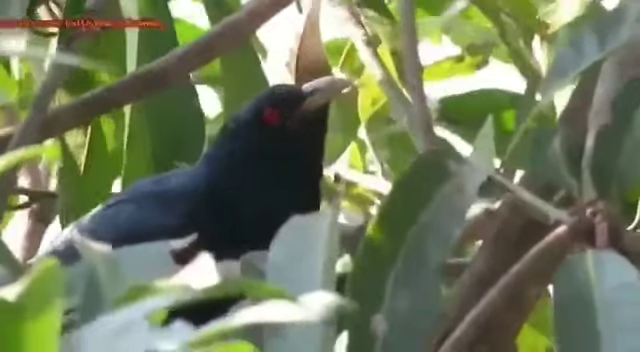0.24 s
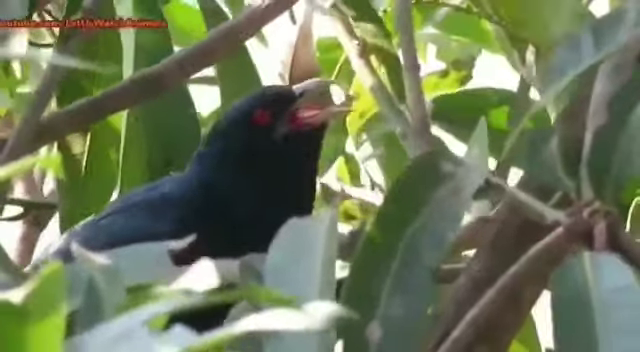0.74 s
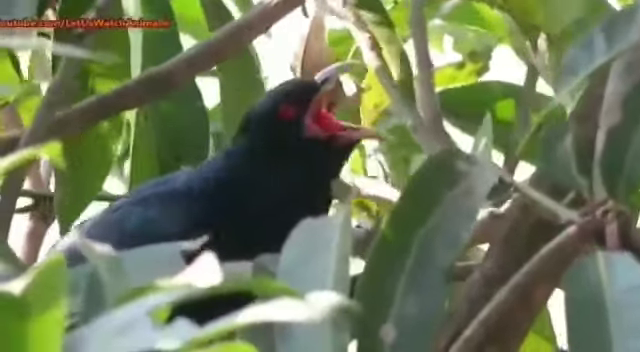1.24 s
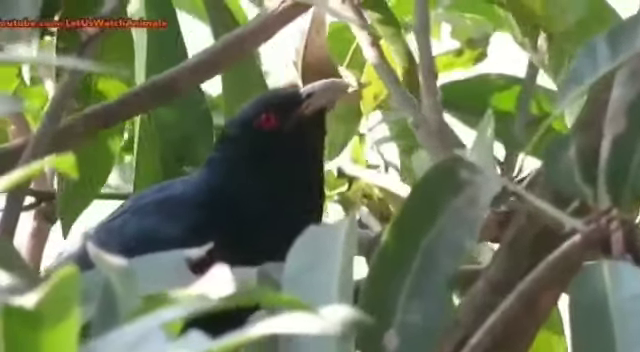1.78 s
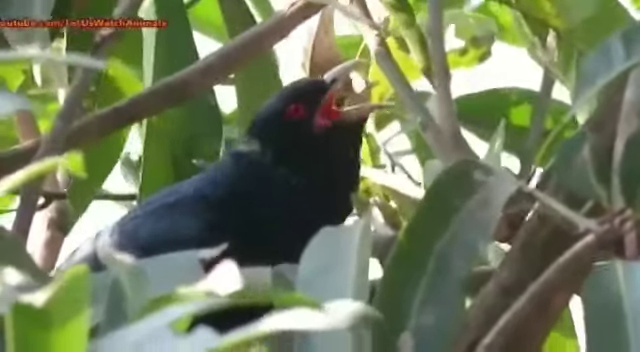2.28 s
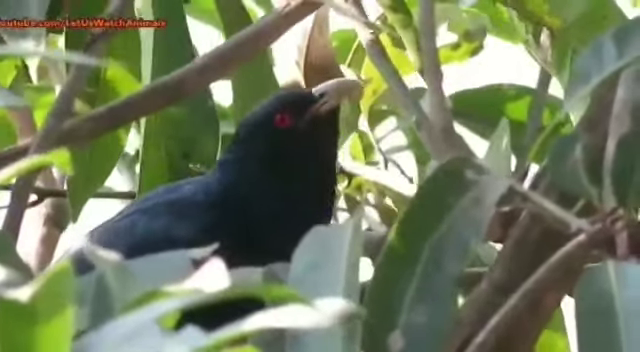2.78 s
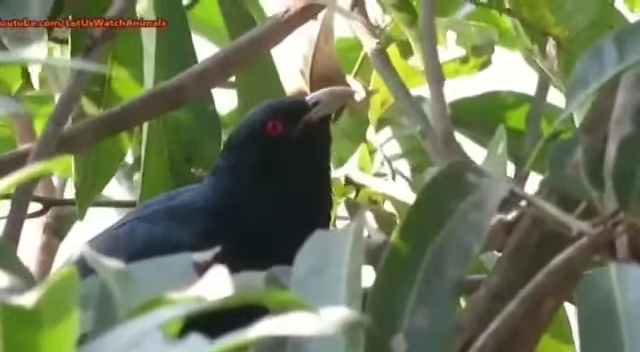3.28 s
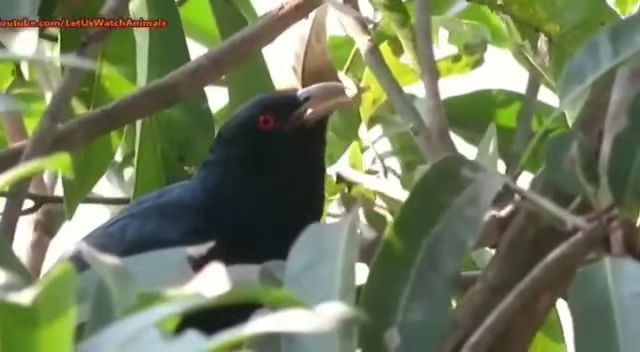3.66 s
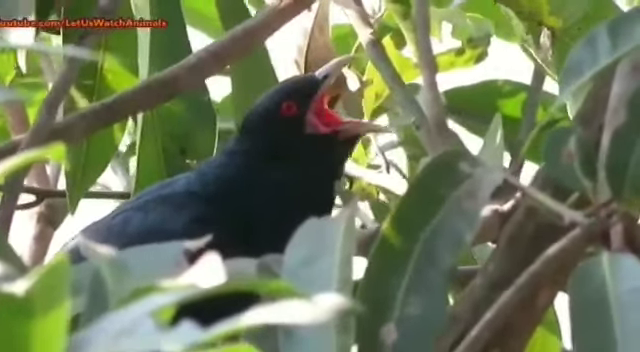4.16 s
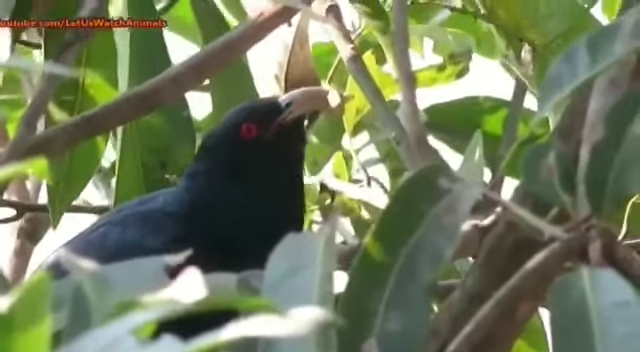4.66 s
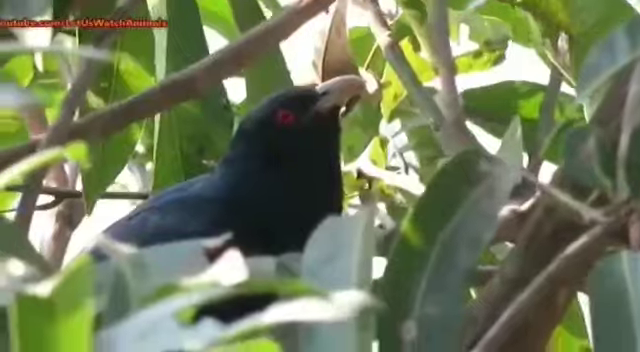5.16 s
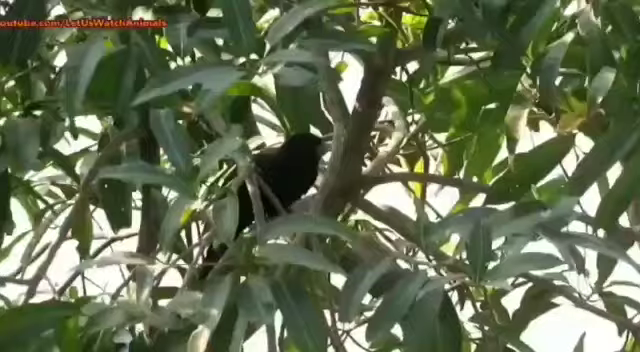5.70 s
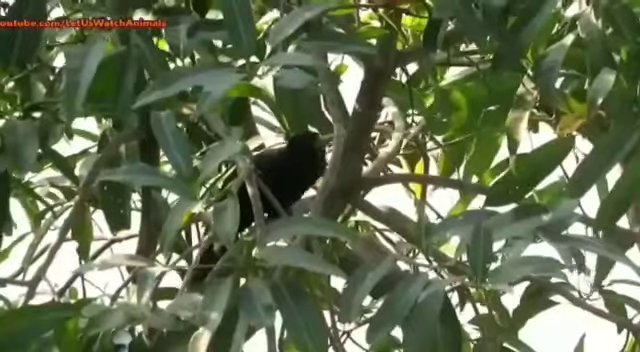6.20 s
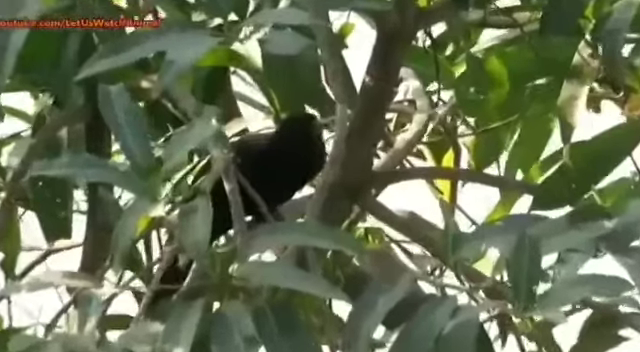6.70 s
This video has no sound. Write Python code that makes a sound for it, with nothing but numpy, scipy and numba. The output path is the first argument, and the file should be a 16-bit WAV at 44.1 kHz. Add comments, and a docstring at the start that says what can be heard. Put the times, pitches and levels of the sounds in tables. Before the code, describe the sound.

Soft far traffic and leaf noise swell in over the first half second, with a low hum and a distant motorbike throbbing loudest around 1 s, fading by 2 s. A koel calls three times, loud and nearly pure: at about 0.4, 1.7 and 3.3 s. Each call holds a brief steady note near 1280 Hz, breaks, then arches up to about 1550 Hz and slides down, lasting roughly half a second and leaving a short diffuse tail among leaves. The background ducks under the notes and creeps back. Faint distant hums and weak low wind puffs occur between 1.4 and 4.3 s. At 5.1 s the ambience switches abruptly, duller, with very faint high thin whistles. At 5.7 s a quieter low note near 950 Hz leads at 5.9 s into a rough, raspy, bright rise to 1280 Hz and fall, echoing off trunks. Bassy wind buffets from about 6.1 s to the end.

```python
"""Far traffic and leaf noise swell in at the start, with a soft hum and a distant motorbike, loudest near 1 s.
A koel calls three times from a leafy tree: a held "ko", then an "el" that arches up, as a nearly pure tone.
Breeze gusts come from 2.5 s as bass noise. At 5.12 s the scene changes; from another perch comes a lower,
rougher call with trunk and wall echoes. Leaves scatter each call into a decaying noise tail; far hums and
whistles are narrow noise bands. Gain control ducks the background under loud notes and lets it creep back."""
import sys
import numpy as np
from scipy import signal
from scipy.fft import rfft, irfft, next_fast_len
from scipy.io import wavfile
from scipy.ndimage import uniform_filter1d
from numba import njit

SR = 44100
rng = np.random.default_rng(int(sys.argv[2]) if len(sys.argv) > 2 else 0)


def materialize(psi):
    """Save the field psi as 16-bit PCM at rate SR to the path in sys.argv[1].

    A 1-D psi becomes a single channel; in a 2-D psi each row is a channel.
    """
    bounded = np.clip(np.atleast_2d(psi).T, -1, 1)
    quanta = np.round(bounded * 32767).astype(np.int16)
    wavfile.write(sys.argv[1], SR, quanta)


N = 306054
TIME = np.arange(N) / SR
MOVE_S = 5.12  # the scene changes here

# harmonics of the voice as the bill opens: (multiple of the pitch,
# level with the bill half open [dB], level with the bill wide [dB])
OVERTONES = [(2, 0, 1), (3, -9, -10), (4, -5.5, -7.5), (5, -4.5, -2), (6, -17.5, -25), (7, -8, -9),
             (8, -25, -7), (9, -11, -13), (10, -20.5, -24), (11, -12.5, -26), (12, -11, -34)]

# Manner of calling at each perch: fall of the ko [dB], attack of the el [s], its leap [pitch ratio],
# bend of its arch, hold-back of overtones at each onset [dB], length of tail [fall times],
# and how level and overtones grow with pitch [dB per octave]
NEAR_MANNER = dict(sag_db=-0.5, attack_s=0.0078, leap=1.012, rise_bend=1.45, late_db=0,
                   tail_per_fall=1.065, loud_db_per_octave=22, bright_db_per_octave=5)
LOW_MANNER = dict(sag_db=18.5, attack_s=0.0023, leap=1.15, rise_bend=1.104, late_db=14,
                  tail_per_fall=2.1, loud_db_per_octave=29.5, bright_db_per_octave=49)


def undb(db):
    """Amplitude ratio from decibels: 20 dB is a factor of ten."""
    return 10 ** (np.asarray(db) / 20)


def unit(x):
    """Normalise to an rms of 1, so that a level can be set by gain alone."""
    return x / np.sqrt(np.mean(x ** 2))


def bump(t, centre, spread):
    """Gaussian bell, 1 at its centre and 1/e at one spread away."""
    return np.exp(-((t - centre) / spread) ** 2)


def resonance(f, centre_hz, width_hz):
    """Gain of a steep-sided resonance: 1 at its centre, falling with the squared detuning."""
    return 1 / (1 + ((f - centre_hz ** 2 / f) / width_hz) ** 2)


def walk(rate):
    """Slow random modulation: interpolated, smoothed random knots, rate per second, with spread near 1."""
    knots = rng.standard_normal(4096)
    wander = np.interp(TIME * rate, np.arange(4096), knots)
    return 1.16 * uniform_filter1d(wander, max(int(SR / rate / 2), 1))


def noise(gain):
    """Spectral shaping: white noise weighted by gain(Hz), brought to rms 1."""
    size = next_fast_len(N)
    hz = np.arange(size // 2 + 1) * SR / size + 1e-3
    spectrum = rfft(rng.standard_normal(size)) * gain(hz)
    return unit(irfft(spectrum, size)[:N])


def delayed(x, lag_s):
    """Propagation delay: the same sound, later."""
    return np.interp(TIME - lag_s, TIME, x)


def two_ports(mid, side, apart_hz=9000, bass_share=0.02):
    """Diffuse-field coherence: two close ports hear nearly the same bass but unrelated treble."""
    hz = np.fft.rfftfreq(len(mid), 1 / SR)
    share = np.minimum(np.hypot(bass_share, hz / apart_hz), 1)
    side = irfft(rfft(side) * share, len(mid))
    return np.array([mid + side, mid - side])


def koel():
    """Direct sound plus reflections: three calls from one perch, then a low call with discrete echoes."""
    # each call: (ko start [s], el start [s], el rise [s], ko pitch [Hz], sharpness of the ko's start
    # [share of pitch], el top pitch [Hz], el fall [s], ko level [dB], el level [dB],
    # overtone level at the top [dB], extra 2nd harmonic in the ko [dB], extra 3rd at the top [dB])
    calls = [(0.367, 0.552, 0.2, 1276, .014, 1546, 0.15, -5, 0.5, -44, -3.5, -4.5),
             (1.686, 1.857, .22, 1290, 0.034, 1566, .123, -8.5, 1.12, -43, 5, 2),
             (3.345, 3.549, .196, 1275, .018, 1550, .147, -5.5, -0.5, -44, -1.5, 6),
             (5.663, 5.926, 0.123, 950, 0.033, 1276, 0.12, -23, -4, -24.5, -14, 0)]
    # trunks beside the second perch throw the low call back: (delay [s], level [dB])
    trunk_echoes = [(.066, -14.5), (0.114, -22), (0.155, -25.5)]
    wall_lag_s, wall_db = .62, -33  # a far wall answers the low call
    low_spread_db = -2  # how much of the low call spreads into the trees

    *near_calls, low_call = calls
    near_direct, near_spread = sum(whistle(call, False) for call in near_calls)
    low_voice = whistle(low_call, True, jitter=0.0028, glide_jitter=0.0035, shimmer_db=2.0, patchy_db=5,
                        rasp_db=-23.5, chiff_db=-47, chiff_s=0.025, croak_db=-32)
    direct, spread = low_voice + squeak(low_call[1])

    trunks = sum(undb(db) * delayed(spread, lag_s) for lag_s, db in trunk_echoes)
    dull = signal.butter(2, 2000, fs=SR, output="sos")
    wall = undb(wall_db) * signal.sosfilt(dull, delayed(spread, wall_lag_s))

    near = foliage(near_direct, near_spread, damp_db_per_s=3.5)
    low = foliage(direct + trunks + wall, undb(low_spread_db) * spread + wall, damp_db_per_s=71)
    return near + low


def whistle(call, low, jitter=0.00094, glide_jitter=0.0025, shimmer_db=2.5, patchy_db=2.5, rasp_db=-30,
            chiff_db=-39, chiff_s=0.04, chiff_hz=1500, croak_db=-50):
    """Syrinx as a frequency-modulated oscillator with faint harmonics: [straight ahead, into the trees]."""
    # the straight path through the leaves favours some pitches: (pitch [Hz], gain [dB])
    near_path = [(1200, -2.5), (1285, 0.5), (1320, 2), (1355, 0), (1410, 6.5), (1450, 1.5), (1500, -7),
                 (1530, -7.5), (1560, -2)]
    low_path = [(780, -0.5), (950, -2), (1095, 5), (1135, -9), (1185, 5), (1230, 5), (1260, -5),
                (1278, -3.5)]
    fray = .085 if low else .04  # unevenness of the cycles [radians]
    onset_s = .02  # the voice opens and closes over this time

    hz, tone_db, over_db, end = gesture(call, **(LOW_MANNER if low else NEAR_MANNER))
    path_db = np.interp(hz, *np.transpose(low_path if low else near_path))
    hz = uniform_filter1d(hz, 300 if low else 800)
    age = TIME - call[0]
    sounding = np.clip(np.minimum(age, end - TIME) / onset_s + .5, 0, 1) ** 2
    on = sounding > 1e-6

    # the tone is steady while held and grows unsteady in fast glides
    octaves_per_s = np.minimum(np.abs(np.gradient(np.log2(hz))) * SR, 5)
    wobble = (jitter + glide_jitter * octaves_per_s) * walk(400)
    phase = 2 * np.pi * np.cumsum((hz * (1 + wobble))[on]) / SR

    # slightly uneven cycles fray the high overtones most
    uneven = phase + fray * walk(550)[on]
    overtones = 0
    for k in range(2, len(OVERTONES) + 2):
        db = overtone_db(k, hz[on], TIME[on] < call[1], call, low) + patchy_db * walk(35)[on]
        audible = k * hz[on] < SR / 2
        overtones = overtones + undb(db) * np.sin(k * uneven) * audible

    # air rushing through the throat
    rasp = undb(rasp_db) * noise(lambda f: (f > 1500) / (1 + (f / 5000) ** 2))[on]
    # a short chiff and a period-doubled croak fade as the ko begins
    chiff = undb(chiff_db) * noise(lambda f: resonance(f, chiff_hz, chiff_hz))[on]
    doubled = np.sin(3 * phase / 2) + np.sin(2 * phase) / 2
    croak = undb(croak_db) * doubled * (1 + walk(200)[on] / 2)
    onset = (chiff + croak) * np.exp(-np.abs(age[on]) / chiff_s)

    shimmer = undb((over_db + shimmer_db * walk(120))[on])
    edge = shimmer * (overtones + rasp) + onset
    out = np.zeros((2, N))
    out[:, on] = undb([(tone_db + path_db)[on], tone_db[on]]) * np.sin(phase) + edge
    return np.sqrt(2) * out * sounding


def gesture(call, sag_db, attack_s, leap, rise_bend, late_db, tail_per_fall, loud_db_per_octave,
            bright_db_per_octave):
    """Coupled pitch and effort: pitch, tone level, overtone level and end time of a held ko and arched el."""
    # echoes cancel the held ko for moments: (time [s], half length [s], depth [dB])
    echo_dips = [(0.466, 0.02, 5.5), (1.741, 0.0076, 19.5), (1.771, 0.0078, 10), (1.844, 0.019, 6),
                 (3.423, 0.0093, 14), (3.463, 0.022, 10)]
    settle_s, creep = 0.045, 0.0162  # the ko settles from sharp, then creeps up by this share of its pitch
    fall_to = 0.545  # share of the top pitch that the el sinks towards
    swell_db, swell_s = 10, 0.052  # the ko swells from this far down
    break_db, break_s = 14, 0.0079  # the ko chokes off just before the el
    release_db, release_s = 10.5, 0.069  # the el dies away as it falls
    late_s = .018  # overtones are held back this long at each onset

    ko_start, el_start, rise_s, ko_hz, sharp, top_hz, fall_s, ko_db, el_db, bright_db, *_ = call
    age, in_ko = np.maximum(TIME - ko_start, 0), TIME < el_start
    through_ko = age / (el_start - ko_start)
    past_top = TIME - el_start - rise_s
    tail_s = tail_per_fall * fall_s  # a quicker fall also ends sooner

    # pitch: hold, rise, fall
    held = ko_hz * (1 + sharp * np.exp(-age / settle_s) + creep * through_ko ** 3)
    climb = np.sin(np.pi / 2 * np.clip((TIME - el_start) / rise_s, 0, 1)) ** rise_bend
    rise = leap * ko_hz + (top_hz - leap * ko_hz) * climb
    fall = top_hz * (fall_to + (1 - fall_to) * bump(past_top, 0, fall_s))
    hz = np.where(in_ko, held, np.where(past_top < 0, rise, fall))

    # level: the ko swells, sags and chokes; the el grows out of that break and dies away
    swell = swell_db * np.clip(1 - age / swell_s, 0, 1)
    release = release_db * np.clip(1 + (past_top - tail_s) / release_s, 0, 1)
    sag = sag_db * (through_ko - .5) * in_ko
    echo_dip = sum(db * bump(TIME, s, half_s) for s, half_s, db in echo_dips)
    ko = ko_db - sag - echo_dip - break_db * bump(TIME, el_start, break_s)

    # the higher the bird pushes, the louder and brighter the voice
    octaves = np.log2(hz / top_hz)
    el = el_db + loud_db_per_octave * octaves
    el = el + (ko_db - break_db - el) * bump(TIME, el_start, attack_s)
    tone_db = np.where(in_ko, ko, el) - swell - release
    late = late_db * (bump(TIME, ko_start, late_s) + bump(TIME, el_start, late_s))
    over_db = bright_db + bright_db_per_octave * octaves - sag - swell / 2 - .75 * release - late
    return hz, tone_db, over_db, el_start + rise_s + tail_s


def overtone_db(k, hz, in_ko, call, low):
    """Source-filter principle: throat resonances weight harmonic k in the low call, the bill in the others."""
    # throat resonances in the low call: (frequency [Hz], gain [dB])
    low_throat = [(1900, -3.5), (2560, -21), (3850, -52), (4700, -19), (4950, -23), (5090, -3), (5300, -12),
                  (5500, -6), (5720, -7), (6150, -9.5), (6360, -1), (6480, -4), (6600, -17), (7000, -26),
                  (7450, -26), (7660, -13.5), (8300, -29), (9000, -24), (10200, -42), (11000, -14),
                  (11500, -13), (12000, -35), (12800, -14.5), (14000, -43)]
    tilt_db = 1  # each higher overtone of the low call is this much weaker
    shut_hz, shut_db_per_octave = 6000, 25  # in the low ko the nearly shut bill muffles what lies above
    half_open_hz, wide_open_hz = 1310, 1557
    crest_hz, off_crest_db = 40, 9  # the 3rd harmonic speaks only close to the top of the arch

    top_hz, (second_db, third_db) = call[5], call[-2:]
    if low:
        muffle = shut_db_per_octave * np.maximum(np.log2(k * hz / shut_hz), 0) * in_ko
        throat_db = np.interp(k * hz, *np.transpose(low_throat))
        return throat_db - tilt_db * (k - 5) - muffle + second_db * (k == 2) * in_ko

    _, half_db, wide_db = OVERTONES[k - 2]
    opening = np.clip((hz - half_open_hz) / (wide_open_hz - half_open_hz), 0, 1)
    # once open, the bill stays wide to the end of the call
    gape = np.maximum.accumulate(opening)
    crest = bump(hz, top_hz, crest_hz)
    extra = {2: second_db * (1 - gape), 3: third_db * crest - off_crest_db * (1 - crest)}
    return half_db + gape * (wide_db - half_db) + extra.get(k, 0)


def squeak(start_s, start_hz=5540, sag_hz_per_s=6500, db=-30, attack_s=.005, decay_s=0.019):
    """Second oscillator: a thin voice splits off as the low el breaks in, gliding down and decaying."""
    age = np.maximum(TIME - start_s, 0)
    phase = 2 * np.pi * np.cumsum(start_hz - sag_hz_per_s * np.minimum(age, .1)) / SR
    envelope = np.minimum(age / attack_s, 1) * np.exp(-age / decay_s)
    return undb(db + 2.3 * walk(150)) * np.sin(phase) * envelope


def foliage(x, spread, damp_db_per_s, treble_hz=3500, gap_s=0.0035, port_lag=0.33):
    """Multiple scattering: direct sound plus convolution with decaying noise whose treble dies sooner."""
    # near leaves, trunks, far trees: (60 dB decay time [s], level at the whistle's pitch [dB],
    # level in the treble [dB])
    scatter = [(0.139, -12, 1), (0.619, -5, -3), (1.699, -15, -36.5)]
    clump_db, clumps_per_s = 2.5, 60  # the trees stand in clumps, so the scatter returns unevenly

    t = np.arange(int(1.5 * SR)) / SR
    split = signal.butter(2, treble_hz, fs=SR, output="sos")
    tails = np.zeros((2, len(t)))
    clumps = undb(clump_db * walk(clumps_per_s)[:len(t)])
    for t60, db, treble_db in scatter:
        grains = rng.standard_normal((2, len(t)))
        dull = signal.sosfiltfilt(split, grains)
        bright = grains - dull
        fade = clumps * undb(-60 * t / t60) * (1 - np.exp(-(t / gap_s) ** 2))
        fade = fade / np.sqrt(np.sum(fade ** 2))
        tails += (undb(db) * dull + undb(treble_db - damp_db_per_s * t) * bright) * fade

    # the direct wave reaches one port a fraction of a sample before the other
    taps = np.arange(-8, 9)
    window = np.hanning(len(taps))
    direct = [np.convolve(x, np.sinc(taps + lag) * window, "same") for lag in (port_lag / 2, -port_lag / 2)]
    scattered = signal.fftconvolve(spread[None], two_ports(*tails), axes=1)[:, :N]
    return np.array(direct) + scattered


def motorbike(pipe_hz=335, pipe_width_hz=220, waver=.01, throb=0.86):
    """Harmonic source and resonator: rising firing harmonics in an exhaust, throbbing every fourth cycle."""
    start_hz, rise_hz_per_s = 111.8, 9.5  # it pulls away
    loudest_s, spread_s, level_db = 1.05, 0.51, -23.5

    hz = start_hz + rise_hz_per_s * TIME
    phase = 2 * np.pi * np.cumsum(hz * (1 + waver * walk(40.34))) / SR
    lines = 0
    for k in range(1, 5):
        pipe_loss = np.hypot(1, (k * hz - pipe_hz) * 2 / pipe_width_hz)
        lines = lines + np.sin(k * phase) * undb(2.2 * walk(11.83)) / pipe_loss
    uneven_firing = 1 + throb * np.cos(phase / 4)
    return unit(lines * uneven_firing) * undb(level_db) * bump(TIME, loudest_s, spread_s)


def far_tones():
    """Narrow-band noise by quadrature modulation: hums and thin whistles, blurred by distance."""
    # (start [s], length [s], start pitch [Hz], end pitch [Hz], bandwidth [Hz], level [dB])
    tones = [(1.358, 0.55, 334.4, 318.4, 49, -21), (1.5, 0.44, 438, 472.6, 62, -31.5),
             (1.53, 0.16, 611, 597, 28, -32), (2.151, 0.21, 680, 682, 19, -29.5),
             (2.242, 0.18, 324, 314, 10, -24), (3.2, 0.25, 790, 828, 45, -35),
             (6.473, 0.23, 478, 486, 11, -31.5), (4.35, 0.25, 4480, 5030, 110, -53),
             (5.113, 0.21, 3970, 3970, 62, -46.5), (5.273, 0.58, 4030, 4100, 65, -47.5),
             (5.359, .42, 4270, 4340, 80, -52), (5.438, 0.16, 4440, 4520, 110, -48.5),
             (5.488, 0.47, 4760, 4770, 90, -49.5), (5.2, 0.63, 3850, 4500, 420, -48),
             (6.462, 0.14, 3020, 2880, 420, -47.5)]
    out = np.zeros(N)
    for s, length, start_hz, end_hz, width_hz, db in tones:
        age = np.clip((TIME - s) / length, 0, 1)
        on = (age > 0) & (age < 1)
        phase = 2 * np.pi * np.cumsum(start_hz + (end_hz - start_hz) * age[on]) / SR
        lowpass = signal.butter(2, width_hz / 2, fs=SR, output="sos")
        blur = signal.sosfilt(lowpass, rng.standard_normal((2, SR)))[:, -len(phase):]
        band = unit(blur[0] * np.cos(phase) + blur[1] * np.sin(phase))
        out[on] += band * undb(db) * np.sqrt(np.sin(np.pi * age[on]))
    return out


def hum(hz=170, width_hz=30, db=-38, swell_s=1.2):
    """Resonance-filtered noise: a soft, unsteady drone that swells in and lasts until the scene changes."""
    drone = noise(lambda f: resonance(f, hz, width_hz))
    return drone * undb(db) * np.minimum(TIME / swell_s, 1) * (TIME < MOVE_S)


def breeze(centre_hz=75, width_hz=130, side_db=-10):
    """Wind turbulence at the microphone: gusts of bass noise, partly incoherent between the ports."""
    # (time [s], half length [s], level [dB])
    gusts = [(2.5, 0.084, -32), (3.485, 0.11, -31), (4.086, 0.23, -29), (6.17, 0.15, -20.5),
             (6.548, 0.28, -22.5)]
    mid, side = (noise(lambda f: resonance(f, centre_hz, width_hz)) for _ in range(2))
    buffeting = mid + undb(side_db) * side * np.array([[1], [-1]])
    return buffeting * sum(undb(db) * bump(TIME, s, half_s) for s, half_s, db in gusts)


def air(points, flutter_db=1.52):
    """Diffuse ambient noise with a set spectrum: far traffic and leaves, wavering a little."""
    hz, db = np.transpose(points)
    mid, side = (noise(lambda f: undb(np.interp(np.log(f), np.log(hz), db))) for _ in range(2))
    return two_ports(mid, side) * undb(flutter_db * walk(7.1))


def scene():
    """Linear superposition of the bird and its surroundings, with one background for each place."""
    # background spectrum before and after the scene changes: (frequency [Hz], relative density [dB per Hz])
    air_near = [(15, -40), (25, -8.5), (48, -1), (88, -4.5), (172, 0.5), (257, -6.5), (383, -4.5),
                (475, -9), (790, -10.5), (1090, -15.5), (1180, -12.5), (2370, -22), (3540, -31.5),
                (12800, -53.5), (15000, -62)]
    air_far = [(15, -29), (25, -12), (125, -1), (278, -4.5), (394, -4), (450, -11), (856, -15),
               (1240, -21.5), (1500, -20), (2850, -33), (4040, -36), (5140, -39), (15000, -58)]
    near_db, far_db = -26.5, -27
    swell_db, swell_s = 3.5, 0.38  # opening swell of the background
    dip_from_s, dip_until_s, dip_db = 6.28, 6.46, -1  # it sinks briefly, then returns at once

    near = air(air_near) * undb(near_db - swell_db * np.maximum(1 - TIME / swell_s, 0))
    dip = np.interp(TIME, [dip_from_s, dip_until_s], [0, 1], right=0)
    far = air(air_far) * undb(far_db + dip_db * dip)
    background = np.where(TIME < MOVE_S, near, far)
    distant = motorbike() + two_ports(far_tones(), far_tones())
    return koel() + distant + hum() + breeze() + background


@njit
def follow(size, top, attack, release):
    """Peak detection: rises quickly and sinks at a steady dB rate to its resting level."""
    out, e = np.empty(len(size)), top
    for i in range(len(size)):
        if size[i] > e:
            e = e + (size[i] - e) * attack
        else:
            e = max(e * release, top)
        out[i] = e
    return out


def record(dry, top_db=-2.5, attack_s=0.0042, recover_db_per_s=8.0):
    """Dynamic compression: peaks are held, gain recovers slowly; then a level per place and a steep top cut."""
    near_gain_db, far_gain_db, top_hz = -4, -8, 15300
    top = float(undb(top_db))
    release = float(undb(-recover_db_per_s / SR))
    peak = follow(np.abs(dry).max(axis=0), top, 1 / (attack_s * SR), release)
    held = dry * top / peak * undb(np.where(TIME < MOVE_S, near_gain_db, far_gain_db))
    return signal.sosfilt(signal.ellip(14, .1, 80, top_hz, fs=SR, output="sos"), held)


dry = scene()
out = record(dry)
materialize(out)
```